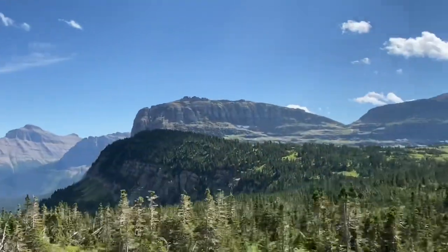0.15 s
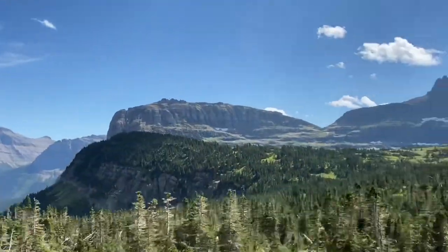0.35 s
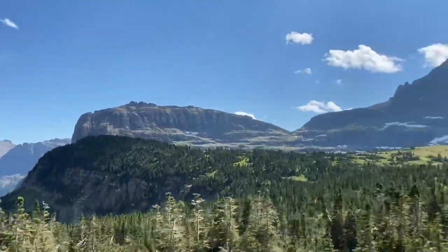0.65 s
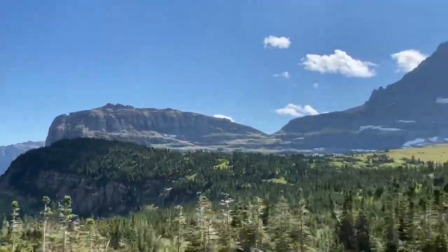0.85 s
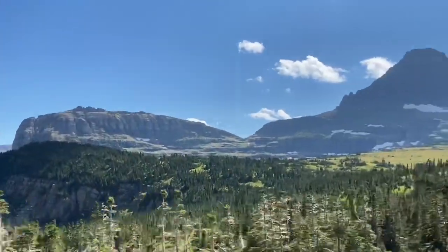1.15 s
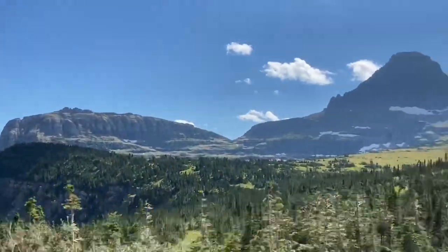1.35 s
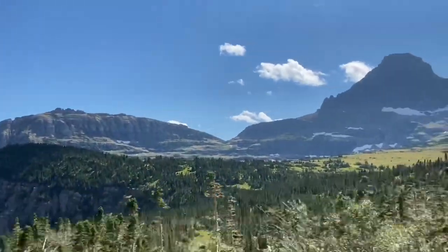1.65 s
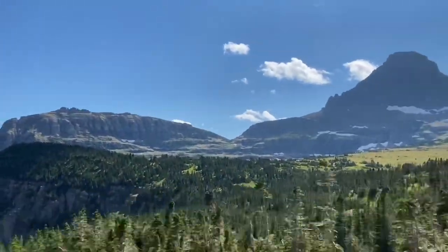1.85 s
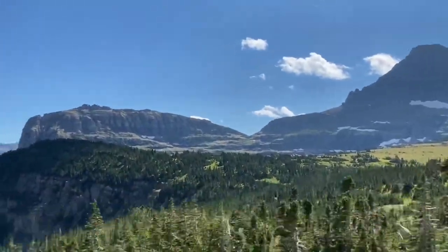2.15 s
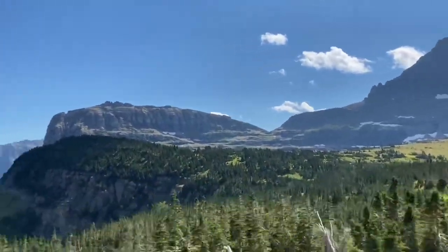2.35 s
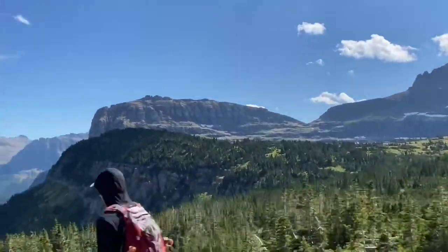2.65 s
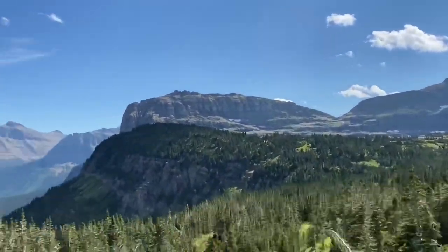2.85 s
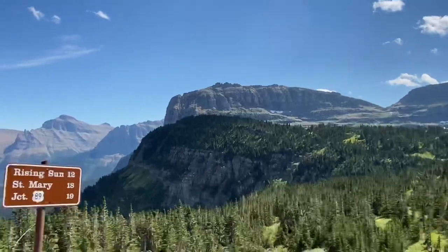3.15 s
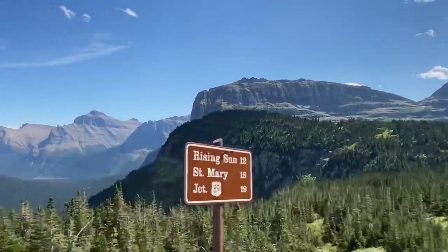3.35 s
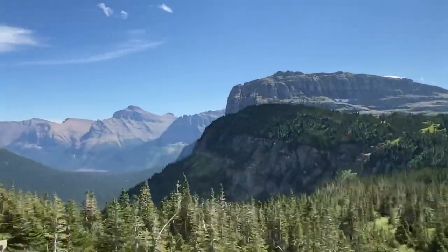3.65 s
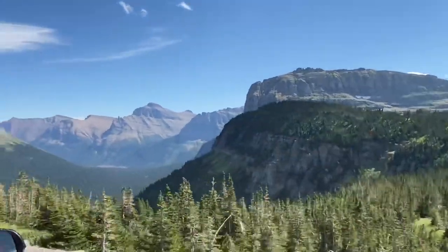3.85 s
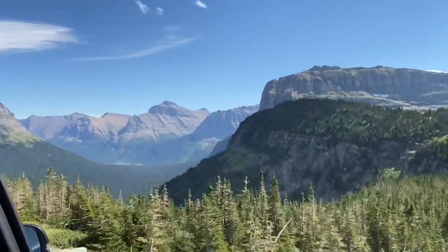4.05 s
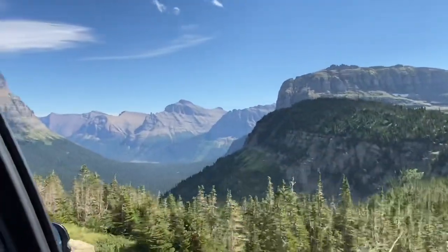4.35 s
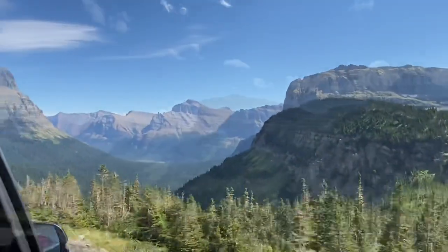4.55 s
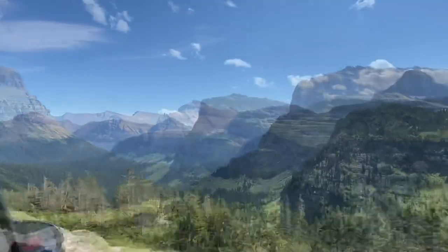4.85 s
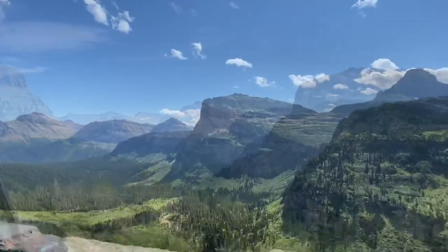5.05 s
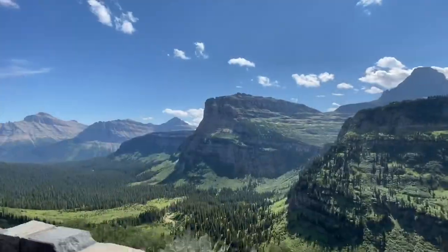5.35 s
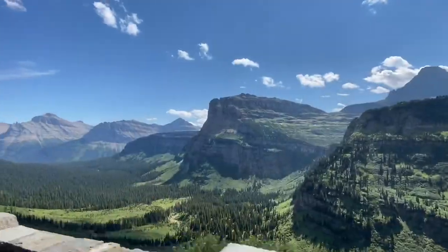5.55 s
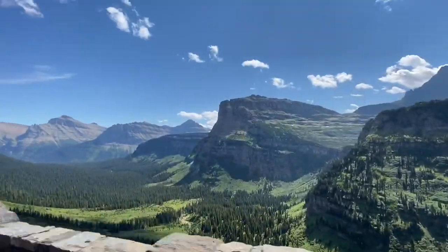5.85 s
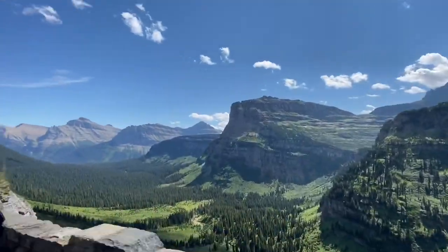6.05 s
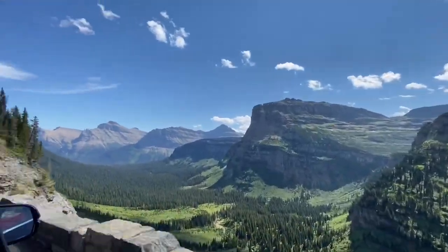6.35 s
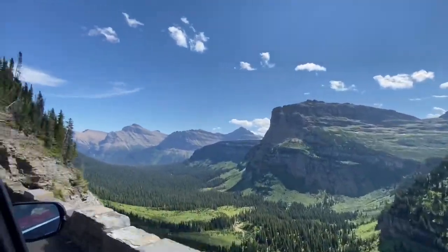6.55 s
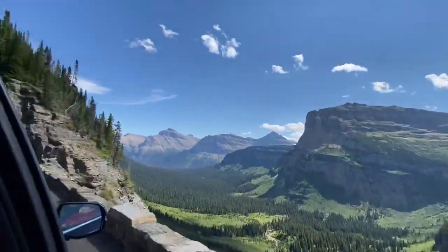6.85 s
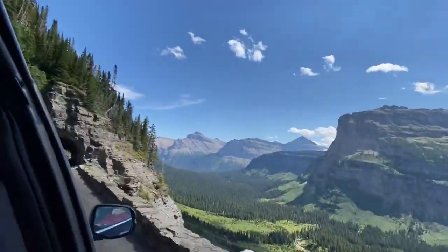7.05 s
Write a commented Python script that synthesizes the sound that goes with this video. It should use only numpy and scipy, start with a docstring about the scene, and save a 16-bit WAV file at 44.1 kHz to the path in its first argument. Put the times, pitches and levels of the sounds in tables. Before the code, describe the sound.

Strong wind beats directly on a microphone held at the open window of a moving car. A loud, lumpy low rumble runs throughout, with a ragged roar and a lighter rush of air above it. Short bursts pop and crackle, and a few bright ticks come around the middle. Near the end the gusts grow harsher and rasp across the microphone.

```python
"""Strong wind beats on a microphone with two ports (openings), held at a moving car's open window.
From the start, big swirls of air (eddies) rumble, small ones roar and tear past in short bursts,
air rushes along the car and the right port hisses. Short, bright ticks come mostly at 3 to 4 s.
A faint, very high hiss swells around 5.5 s, and gusts rasp across the ports, mostly near the end.
All along, the recorder keeps the bass in the middle and holds down the loudest peaks."""
import sys
import numpy as np
from scipy import signal
from scipy.fft import rfft, irfft, next_fast_len
from scipy.io import wavfile
from scipy.ndimage import uniform_filter1d, minimum_filter1d

SR = 44100
rng = np.random.default_rng(int(sys.argv[2]) if len(sys.argv) > 2 else 0)


def output_pcm(signal):
    """Save a mono or channel-first signal as 16-bit PCM at the path in sys.argv[1].

    Samples are clipped to [-1, 1] before scaling.
    """
    pcm = np.clip(np.atleast_2d(signal).T, -1, 1) * 32767
    wavfile.write(sys.argv[1], SR, np.round(pcm).astype(np.int16))


N = 317608

# the wind's slow changes: (time [s], rumble [dB], roar [dB], roar brightness [dB per octave])
WIND_STRENGTH = [(0, -11, -23, 1), (.12, -20, -28.5, 4.5), (0.299, -14.5, -24.5, -2.5),
                 (.84, -18, -22, -1.5), (1.301, -17, -19, -3.5), (1.649, -18, -21, -2),
                 (1.96, -18, -28.5, 1), (2.251, -17, -20.5, -3), (2.89, -16, -23.5, 2),
                 (3.35, -12, -17.5, 2.5), (3.83, -16, -16, -0.5), (4.291, -19, -19.5, 0),
                 (4.449, -17.5, -24, 2.5), (4.598, -20.5, -22.5, -2.5), (5.05, -20, -24, 2),
                 (5.25, -13.5, -19.5, 1), (6.26, -20, -18, -1), (6.8, -17, -15.5, 2),
                 (7.05, -18.5, -19, 0.5), (7.2, -14, -10, 2.5)]
# gusts (+) and lulls (-): (middle [s], half-length [s], rumble change [dB], roar change [dB])
GUSTS_AND_LULLS = [(1.583, 0.017, -12, -3), (2.397, 0.02, -10.5, -0.5), (5.347, 0.049, 1, 7),
                   (6.489, 0.025, -4, -12), (1.064, 0.028, 8, 7), (1.521, 0.065, 5.5, 6.5),
                   (5.62, 0.062, 6.5, -2), (5.82, 0.11, -0.5, 6), (6.377, 0.08, 11, 5.5)]
# tone of the big eddies: (frequency [Hz], relative level [dB])
RUMBLE_TONE = [(15, -34.5), (30, -9.5), (55, 11), (100, 9), (200, 0), (400, -9.5), (800, -68.5)]
# strong eddies hitting the ports: (time [s], level [dB], half-length [s], brightness [dB per octave])
EDDY_BURSTS = [(0.065, -4, 0.015, -1), (.086, 4.5, 0.005, 2), (0.151, -10, 0.0077, -0.5),
               (0.181, -17, 0.0077, -0.5), (0.367, -4.5, 0.01, -0.5), (0.762, -9, 0.019, -1.5),
               (0.843, -7.5, 0.031, -2), (.906, -6.5, 0.011, 3.5), (0.933, -5.5, 0.0083, -0.5),
               (1.002, -1.5, 0.0038, -3.5), (1.095, 6, 0.0044, 2), (1.251, -15, 0.006, -8),
               (1.335, -9, 0.0089, -2), (1.408, -7, 0.0053, -5.5), (1.464, -6, 0.015, 1.5),
               (1.511, -14.5, 0.0052, 3.5), (1.547, -11.5, 0.018, 1.5), (1.737, -14, 0.0097, -3),
               (1.794, -21, 0.0015, -2), (2.077, -13, 0.023, -4.5), (2.254, -4, 0.0034, -6.5),
               (2.314, 5.5, 0.0048, -3.5), (2.424, 2.5, 0.0063, -3.5), (2.45, -4.5, 0.0068, -4.5),
               (2.591, -8, 0.0087, -0.5), (2.639, -10.5, 0.025, 0.5), (2.685, -7, 0.006, 2),
               (2.781, 9, 0.0029, 2.5), (2.969, -1.5, 0.0025, 0.5), (2.995, -15, 0.0014, 7),
               (3.017, 6.5, 0.0035, 0.5), (3.027, -5.5, 0.0039, 5.5), (3.056, -6, 0.0021, 3.5),
               (3.164, -15.5, 0.00091, 7.5), (3.194, 4, 0.0038, 6), (3.26, -5, 0.0054, 4),
               (3.32, 13, 0.0042, 3), (3.333, 11, 0.0018, 3), (3.372, 3.5, 0.0025, 5),
               (3.438, -1, 0.0033, 1.5), (3.508, 5.5, 0.0012, -2.5), (3.583, -5, 0.0047, 1.5),
               (3.625, 0.5, 0.0042, 1.5), (3.716, 1, 0.0023, 3.5), (3.74, -4, 0.01, 0),
               (3.789, -6, 0.0036, -4.5), (4.239, -3, 0.0014, -1.5), (4.4, -8, 0.017, 2.5),
               (4.456, -2, 0.0041, 1.5), (4.706, -9, 0.013, 0.5), (5.087, -11.5, 0.018, -6),
               (5.359, -3.5, 0.0095, -6), (5.404, -1, 0.012, 1), (5.686, -6, 0.0067, 0.5),
               (5.782, -2.5, 0.0096, -0.5), (5.897, -5.5, 0.028, -2.5), (6.034, -2.5, 0.006, 0),
               (6.047, -9, 0.0059, 2.5), (6.14, -6, .004, 3.5), (6.33, -7.5, 0.021, 5),
               (6.379, 0, 0.0097, 3), (6.426, 7.5, 0.0067, 1.5), (6.511, -9, 0.0036, -2),
               (6.617, -6, 0.028, 2.5), (6.672, -4, 0.015, 1.5), (6.707, -4.5, .003, 3),
               (6.731, -5.5, 0.015, 0.4), (6.828, -4, 0.022, 5), (6.912, 11.5, 0.004, 2.5),
               (6.96, -9.5, 0.019, 4)]
# tone of the small eddies: (frequency [Hz], relative level [dB])
EDDY_TONE = [(40, -10.5), (120, 0), (300, 0.5), (600, -4), (1200, -13.5), (2000, -20.5), (3200, -37),
             (6000, -61), (10000, -70), (16000, -110)]
# eddies at the two ports: (frequency [Hz], left-right likeness [0 to 1], right port's lead [radians])
EDDY_STEREO = [(765, 0.53, -3.5), (1440, 0.46, -1), (2420, 0.1, 3.5), (3300, 0.57, 4.5), (5000, 0.55, 6)]
# air flowing past: (time [s], rush along the car [dB], port hiss [dB])
AIR_LEVELS = [(0, -47, -50), (.14, -53, -61), (0.401, -43.5, -49.5), (.54, -47, -66), (1.9, -53.5, -83.5),
              (2.499, -47.5, -58.5), (3.001, -43.5, -52), (3.401, -43, -44), (3.9, -45, -54),
              (4.5, -50, -58), (5.1, -42, -56), (5.551, -41.5, -53), (6.2, -44, -48.5), (6.6, -44.5, -51.5),
              (7.2, -40, -59)]
# tone of the rush: (frequency [Hz], relative level [dB])
RUSH_TONE = [(800, 10.5), (2000, 11.5), (3100, 9.5), (4200, 8), (6500, 1.5), (9000, -12.5), (11500, -40),
             (14000, -39), (16000, -56)]
# the rush at the two ports: (frequency [Hz], left-right likeness [0 to 1])
RUSH_STEREO = [(2500, 0.55), (5000, 0.87), (7300, 0.63), (9200, .4)]
# tone of the port hiss: (frequency [Hz], relative level [dB])
HISS_TONE = [(7700, -51.5), (8050, 3), (9000, -5), (10500, -16.5), (12000, -39.5)]
# brief flares of the port hiss: (time [s], boost [dB])
HISS_FLARES = [(5.11, 9.9), (5.36, 8.7), (5.82, 4.7), (6.062, 4.2), (6.25, 7.5)]
# short, bright ticks, often on a wind burst: (time [s], level [dB])
BRIGHT_TICKS = [(.1486, -39), (3.018, -23), (3.1914, -26), (3.37, -28), (3.5045, -17), (3.7153, -25),
                (4.1664, -38), (4.2967, -37)]
# gusts tearing across the ports: (time [s], level [dB], half-length [s], centre frequency [Hz])
GUST_RASPS = [(4.399, -29, 0.014, 2850), (4.705, -43, .005, 4970), (6.676, -32.5, 0.01, 3460),
              (6.812, -32.5, 0.012, 4500), (6.851, -28, 0.019, 4200), (6.861, -24.5, 0.0025, 4600),
              (6.94, -34, 0.042, 3300), (7.173, -33, 0.012, 3480)]
# tone of the very high hiss: (frequency [Hz], relative level [dB])
HIGH_HISS_TONE = [(11800, -11), (13300, -2), (14600, -9), (15500, -23)]
# where the recorder starts to blend left and right bass: (time [s], corner frequency [Hz])
BASS_CORNER = [(0, 1215), (2, 1206), (2.499, 725), (4.4, 875), (4.47, 211), (4.75, 188), (5.05, 407),
               (7.2, 653)]

TIME = np.arange(N) / SR
FRAME_S, FRAME_TIME = 32 / SR, np.arange(N // 32 + 5) * 32 / SR  # a coarser clock: every 32 samples


def gain_of(db):
    """Turns decibels into a number to multiply by."""
    return 10 ** (np.asarray(db) / 20)


def unit_level(x):
    """Scales a signal so that its average size (rms) is 1."""
    return x / np.sqrt(np.mean(abs(x) ** 2) + 1e-20)


def look_up(points, hz, column=1):
    """Reads between a table's rows, on a scale of octaves."""
    table = np.transpose(points)
    return np.interp(np.log(hz + 1), np.log(table[0] + 1), table[column])


def colour(x, tone):
    """Filters a sound by a tone table; white noise keeps its overall level."""
    size = next_fast_len(N)
    gain = unit_level(gain_of(look_up(tone, np.fft.rfftfreq(size, 1 / SR))))
    return irfft(rfft(x, size) * gain, size)[..., :N]


def wander(low_hz, high_hz, slope, count=N, step_s=1 / SR):
    """A random curve that wobbles mostly between two rates; more slope favours the slow wobbles."""
    hz = np.fft.rfftfreq(count, step_s)
    shape = (hz > low_hz) / (hz + low_hz) ** slope / (1 + (hz / high_hz) ** 2)
    return unit_level(irfft(rfft(rng.standard_normal(count)) * shape, count))


def gust_db(t, column):
    """Each gust or lull moves the level, holds it and lets it go."""
    return sum(row[column] * np.exp(-((t - row[0]) / row[1]) ** 4) for row in GUSTS_AND_LULLS)


def rumble():
    """Big, slow eddies press on both ports alike, in lumps."""
    times, db = np.transpose(WIND_STRENGTH)[:2]
    lumps_db = 2.6 * wander(8.3, 33, slope=0.39)
    lumpy = unit_level(colour(rng.standard_normal(N), RUMBLE_TONE) * gain_of(lumps_db))
    return lumpy * gain_of(np.interp(TIME, times, db) + gust_db(TIME, column=2))


def tearing(crackle_db, top_hz):
    """Uneven flow shakes the loudness very fast, with rare sharp peaks."""
    wobble = wander(20, top_hz, slope=0.18)
    return unit_level(gain_of(crackle_db * (wobble + 0.28 * wobble ** 2)))


def port_noise(power, crackle_db, stereo, lead, cracks=0):
    """Air noise, partly alike at the two ports; power sets its strength by frequency and frame."""
    real, imaginary = rng.standard_normal((power.shape[1], 65, 2, 2)).T
    spectra = real + 1j * imaginary
    white = signal.istft(spectra, nperseg=128, noverlap=96)[1]
    shaped = signal.istft(spectra * np.sqrt(power), nperseg=128, noverlap=96)[1][:, :N] / np.std(white)
    # the left port pops, the right is more sheltered
    crackle = [tearing(crackle_db, top_hz=380), tearing(0.73 * crackle_db, top_hz=91)]
    size = next_fast_len(N)
    left, right_only = rfft(shaped * crackle + cracks, size)
    hz = np.fft.rfftfreq(size, 1 / SR)
    likeness = np.clip(look_up(stereo, hz), 0, 1)
    right = likeness * np.exp(1j * lead(hz)) * left + np.sqrt(1 - likeness ** 2) * right_only
    return irfft([left, right], size)[:, :N]


def small_eddies():
    """Small eddies make a ragged roar; each strong one adds a burst and a hard pulse of pressure."""
    t = FRAME_TIME
    octaves = np.log2(np.clip(np.fft.rfftfreq(128, 1 / SR)[:, None], 150, 6000) / 700)  # from 700 Hz
    times, _, roar_db, tilt_db = np.transpose(WIND_STRENGTH)
    ragged_db = (2.0 + 0.53 * octaves) * wander(3.6, 88, slope=0.8, count=len(t), step_s=FRAME_S)
    patches = uniform_filter1d(rng.standard_normal((len(t), 65)), size=16, axis=0)  # blur in time
    patches = unit_level(uniform_filter1d(patches, size=3, axis=1)).T  # and in frequency
    wind_db = np.interp(t, times, roar_db) + gust_db(t, column=3) + np.interp(t, times, tilt_db) * octaves
    power = gain_of(wind_db + ragged_db + 3.22 * patches) ** 2
    cracks = np.zeros((2, N))
    for (peak_s, db, half_s, bright_db), sign in zip(EDDY_BURSTS, rng.choice([-1, 1], len(EDDY_BURSTS))):
        near = slice(*np.searchsorted(t, [peak_s - .06, peak_s + .06]))
        width_s = half_s * np.where(t[near] < peak_s, 0.68, 1)  # rises faster than it falls
        swell = 0.79 * np.exp(-((t[near] - peak_s) / width_s) ** 2)
        burst_db = db + bright_db * octaves
        power[:, near] += (gain_of(burst_db) * swell) ** 2
        at = round((peak_s - .6 * half_s) * SR)  # the pulse strikes just before the peak
        cracks[0, at:at + 128] += sign * np.fft.fftshift(irfft(gain_of(burst_db[:, 0] + 19)))
    roar = port_noise(power, crackle_db=2.8, stereo=EDDY_STEREO, cracks=cracks,
                      lead=lambda hz: look_up(EDDY_STEREO, hz, column=2))
    return colour(roar, EDDY_TONE)


def air_rush(delay_s=0.0004866):
    """Smoother air rushes along the car from the left, so it reaches the right port a little later."""
    times, db, _ = np.transpose(AIR_LEVELS)
    flutter_db = 2.0 * wander(10, 41, slope=0.24, count=len(FRAME_TIME), step_s=FRAME_S)
    power = gain_of(np.interp(FRAME_TIME, times, db) + flutter_db) ** 2 * np.ones((65, 1))
    rush = port_noise(power, crackle_db=2.66, stereo=RUSH_STEREO,
                      lead=lambda hz: -2 * np.pi * hz * delay_s)
    return colour(rush, RUSH_TONE)


def port_hiss(flicker_db, flare_s=0.033):
    """Air hisses at the right port, only faintly at the left, flickering and briefly flaring."""
    times, _, db = np.transpose(AIR_LEVELS)
    hiss = unit_level(colour(rng.standard_normal(N), HISS_TONE) * gain_of(flicker_db))
    flares_db = sum(boost * np.exp(-((TIME - at_s) / flare_s) ** 2) for at_s, boost in HISS_FLARES)
    return hiss * gain_of(np.interp(TIME, times, db) + flares_db) * np.array([[.12], [1]])


def ticks():
    """Each tick is a millisecond of bright noise, partly alike at both ports."""
    t, out = np.arange(200) / SR, np.zeros((2, N + 200))
    blip = np.exp(-((t - .0015) / 0.0003) ** 2)
    for (time_s, db), noise in zip(BRIGHT_TICKS, rng.standard_normal((len(BRIGHT_TICKS), 3, 200))):
        at = round(time_s * SR)
        out[:, at:at + 200] += gain_of(db) * (noise[0] + 1.6 * noise[1:]) * blip
    return signal.sosfilt(signal.butter(2, [7000, 13000], "band", fs=SR, output="sos"), out)[:, :N]


def rasps():
    """A gust tearing across the ports makes a short swell of noise around its own pitch."""
    t, hz = np.arange(-4096, 4096) / SR, np.fft.rfftfreq(8192, 1 / SR) + 1
    out = np.zeros((2, N + 8192))
    for peak_s, db, half_s, centre_hz in GUST_RASPS:
        noise = rng.standard_normal((3, 8192))  # shared, left, right
        tone = gain_of(-18 * np.log2(hz / centre_hz) ** 2)  # 18 dB weaker one octave away
        band = unit_level(irfft(rfft(noise[0] + 1.4 * noise[1:]) * tone))
        at = round(peak_s * SR) - 4096
        out[:, at:at + 8192] += gain_of(db) * band * np.exp(-(t / half_s) ** 2)
    return out[:, :N]


def high_hiss(flicker_db, middle_s=5.55, half_s=0.82, db=-70):
    """A thin, very high hiss swells once and fades."""
    hiss = unit_level(colour(rng.standard_normal(N), HIGH_HISS_TONE) * gain_of(.8 * flicker_db))
    return hiss * gain_of(db) * np.exp(-((TIME - middle_s) / half_s) ** 4)


def scene():
    """Adds up all the sounds at the two ports."""
    wind = rumble() + small_eddies() + air_rush()
    flicker_db = 4.34 * wander(3.1, 80, slope=0.23)  # both hisses flicker together
    return wind + port_hiss(flicker_db) + high_hiss(flicker_db) + rasps() + ticks()


def record(dry):
    """The recorder moves the bass to the middle, turns peaks down and cuts the highest treble."""
    hz, t, (mid, side) = signal.stft([dry[0] + dry[1], dry[0] - dry[1]], SR, nperseg=1024)
    times, corner_hz = np.transpose(BASS_CORNER)
    ratio = hz[:, None] / np.interp(t, times, corner_hz) + 1e-9
    width = 1 / (1 + ratio ** -3.5) / (1 + (ratio / 0.68) ** -12)  # mono an octave under the corner
    mid = mid - 1j * np.sqrt(1 - width ** 2) * side  # what leaves the sides joins the middle
    pair = signal.istft([mid + width * side, mid - width * side], SR, nperseg=1024)[1][:, :N] / 2
    peak = -minimum_filter1d(-abs(pair).max(0), size=181)  # the biggest sample within about 4 ms
    gain = np.minimum(1, (.8 / (peak + 1e-9)) ** .9)
    limited = pair * uniform_filter1d(uniform_filter1d(gain, size=91), size=91)
    treble_cut = signal.firwin(511, cutoff=15800, window=("kaiser", 9), fs=SR)
    return signal.oaconvolve(limited, treble_cut[None], "same")


dry = scene()
out = record(dry)
output_pcm(out)
```